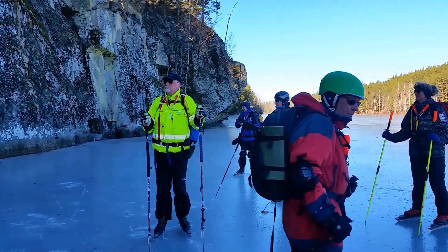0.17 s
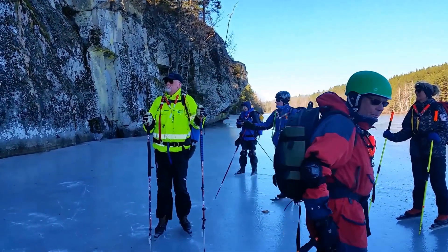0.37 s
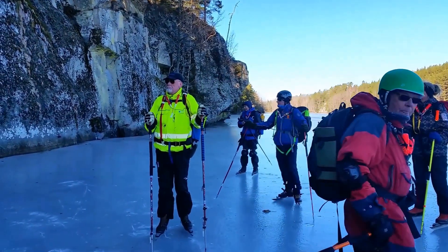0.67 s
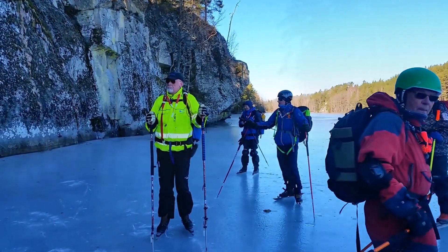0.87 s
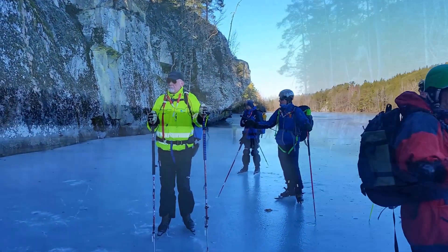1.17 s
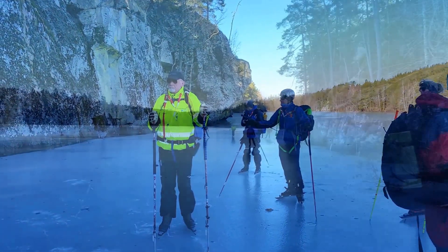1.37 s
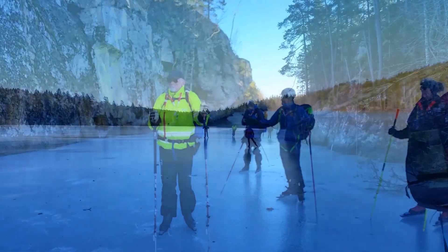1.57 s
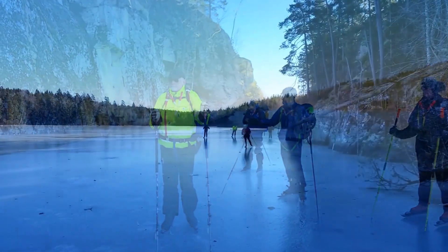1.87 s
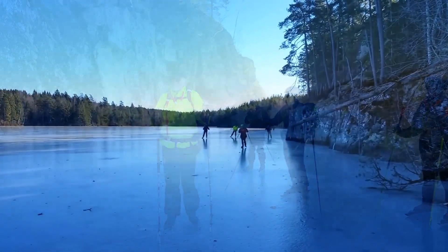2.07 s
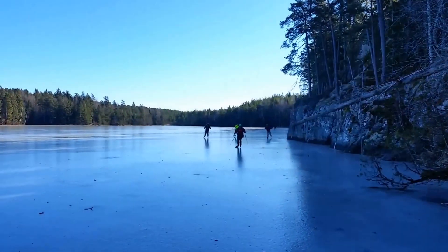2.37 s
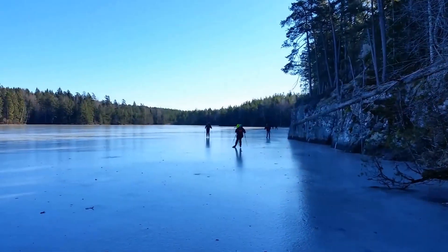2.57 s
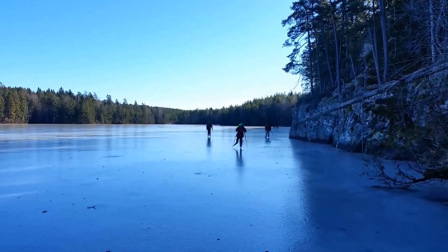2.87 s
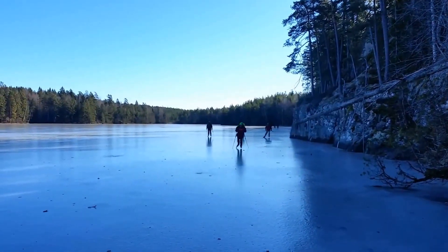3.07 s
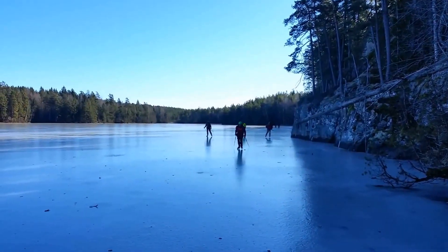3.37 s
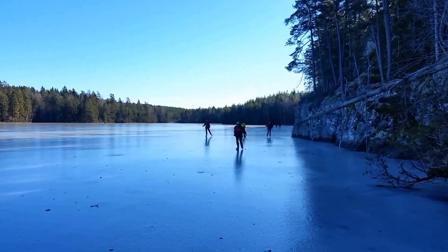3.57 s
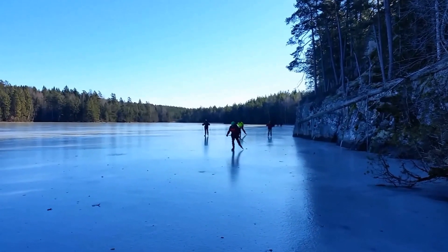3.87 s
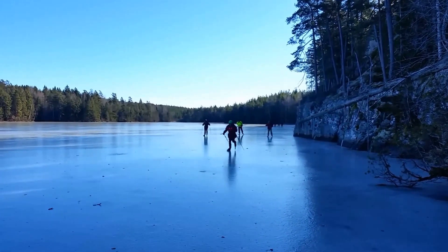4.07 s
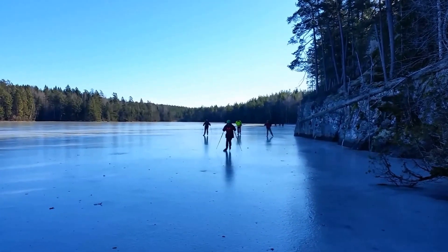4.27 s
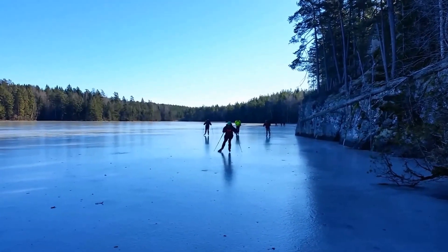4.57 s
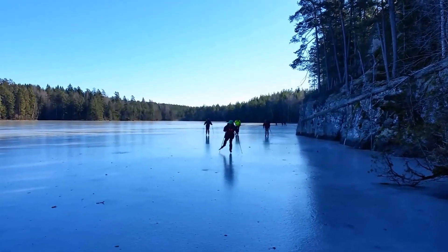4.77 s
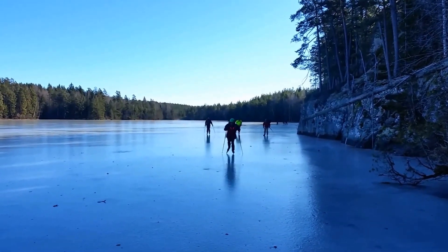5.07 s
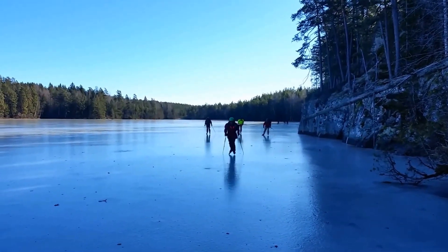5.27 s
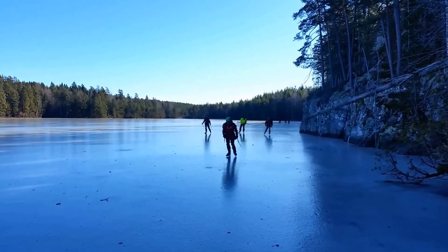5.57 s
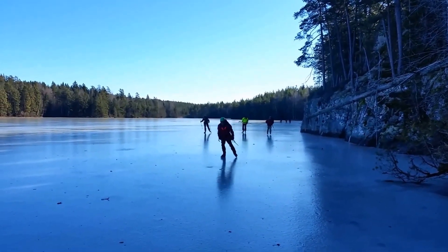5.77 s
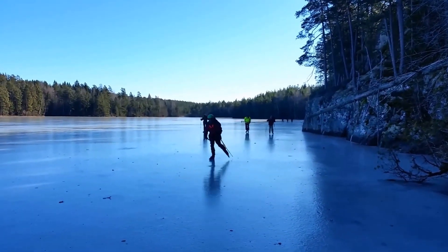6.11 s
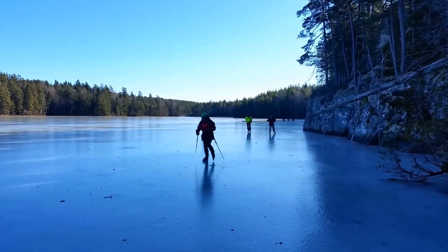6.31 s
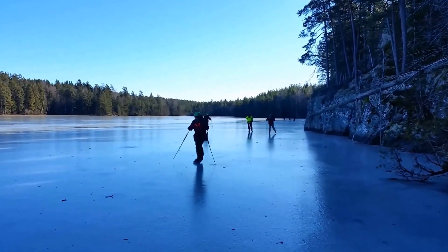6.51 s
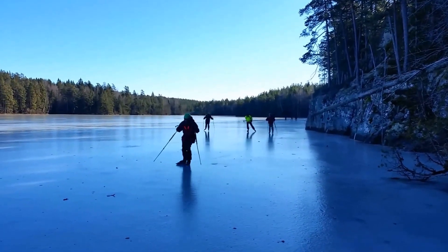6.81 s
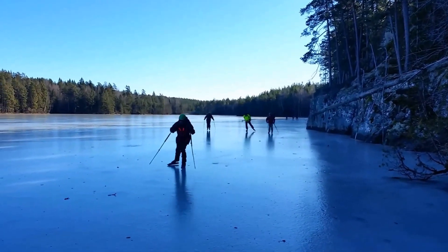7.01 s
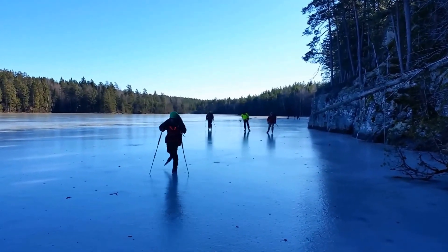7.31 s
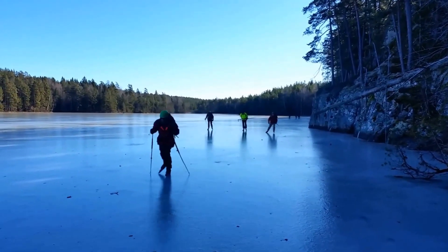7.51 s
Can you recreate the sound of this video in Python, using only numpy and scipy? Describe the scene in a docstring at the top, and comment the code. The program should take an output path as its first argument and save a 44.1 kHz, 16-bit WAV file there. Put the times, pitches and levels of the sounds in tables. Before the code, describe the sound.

Wind rumbles and slaps heavily against a hand-held stereo microphone while steel skates scrape, hiss and tick over hard lake ice.

```python
"""Wind buffets a small hand-held stereo microphone on a frozen lake: a heavy rumble with sharp slaps.
Each port takes its own chance kicks of air. Long steel skates scrape and tick over the hard ice,
close by at first, then farther out: chance ice chips drive dull rings near 2 kHz, a rasp near 5 kHz,
a fine spray and thin, evenly spaced high tones, as from an echo off the ice. Shaped noise adds
a faint hiss, mostly in the left port, and open air."""
import sys
import numpy as np
from scipy.fft import rfft, irfft, next_fast_len
from scipy.io import wavfile
from scipy.ndimage import map_coordinates

SR = 44100
rng = np.random.default_rng(int(sys.argv[2]) if len(sys.argv) > 2 else 0)


def dump(signal):
    """Clip the signal to [-1, 1] and save it as 16-bit WAV at the path in sys.argv[1]."""
    limited = np.clip(np.atleast_2d(signal).T, -1, 1)
    pcm = np.round(limited * 32767).astype(np.int16)
    wavfile.write(sys.argv[1], SR, pcm)


N = 337365
CLOCK_S = np.arange(N) / SR


def amp(db):
    """Decibels to gain."""
    return 10 ** (np.asarray(db) / 20)


def unit(x):
    """Each channel at rms 1."""
    return x / np.sqrt(np.mean(x ** 2, axis=-1, keepdims=True) + 1e-20)


def shape(points):
    """Gain by frequency from (Hz, dB) points on a log axis; all but silent outside them."""
    f, v = np.transpose(points)
    return lambda hz: amp(np.interp(np.log(hz + 1), np.log(f), v, left=-120, right=-120))


def modes(table):
    """The response of a few resonances, alternating in sign, passed twice for steep skirts."""
    def response(f):
        total = 0
        for k, (centre, width, db) in enumerate(table):
            resonance = 1j * f * width / (centre * centre - f * f + 1j * f * width)
            total = total + (-1) ** k * amp(db) * resonance
        return total ** 2
    return response


def curves(rows):
    """One value per sample for each column after the time."""
    s, *columns = np.transpose(rows)
    return np.array([np.interp(CLOCK_S, s, column) for column in columns])


def wobble(rate):
    """A smooth random curve, rate knots a second."""
    knots = rng.standard_normal(int(N * rate / SR) + 4)
    return map_coordinates(knots, [np.arange(N) * rate / SR])


def filtered(x, response):
    """x times a response of frequency."""
    m = next_fast_len(N + 8192)  # padded, so that tails do not wrap round
    return irfft(rfft(x, m) * response(np.fft.rfftfreq(m, 1 / SR)), m)[..., :N]


def grains(rate, spread_db, channels):
    """Random kicks, rate a second: many small, a few large."""
    count = int(rate * N / SR)
    at, sign, size = rng.random((3, channels, count))
    kicks = np.sign(sign - .5) * amp(-spread_db * np.log(size + 0.0032))
    return np.array([np.bincount((a * N).astype(int), k, N) for a, k in zip(at, kicks)])


def lake_air():
    """Soft air over the open lake: shaped noise whose level drifts alike in both ports."""
    # Colour of the air: pitch_hz, level_db (per Hz, relative)
    air_points = [(300, 24), (800, 20), (2000, 16), (3200, -8), (4500, -3), (6000, -34.5), (7500, -55.5),
                  (10500, -25.5), (16000, -23.5)]
    return amp(-57.5 + wobble(4.7)) * unit(filtered(rng.standard_normal((2, N)), shape(air_points)))


def port_hiss():
    """A steady narrow hiss: shaped noise, 13 dB weaker in the right port."""
    # Colour of the hiss: pitch_hz, level_db (per Hz, relative)
    hiss_points = [(300, -27), (1000, -18.5), (2500, -5.5), (3300, -9), (4250, 4.5), (5200, -9),
                   (6500, -50.5), (9000, -40), (11000, -18.5), (16000, -15.5)]
    return amp([[-59], [-72]]) * unit(filtered(rng.standard_normal((2, N)), shape(hiss_points)))


def wind_flow():
    """Eddies hit each port as single pushes; a big push also carries a brighter edge."""
    # Wind on each port, before its chance swells: start_s, strength_db, edge_db (over the rumble)
    left_rows = [(0, -35, 8), (.17, -37, -14), (.3, -20, -16.5), (.62, -35, -21), (.78, -18.5, -20.5),
                 (1.15, -16.5, -20.5), (1.32, -11, -27), (1.5, -15.5, -26), (1.8, -21.5, -13.5),
                 (2.02, -24, -10.5), (2.25, -13, -15), (2.4, -22.5, -28.5), (2.75, -22.5, -25.5),
                 (3.1, -17.5, -14), (3.35, -17, -16.5), (3.5, -47.5, -6.5), (3.75, -43.5, -8),
                 (3.87, -23.5, -14.5), (4.13, -16.5, -17), (4.5, -15.5, -9), (4.75, -17.5, -30),
                 (5.0, -17.5, -8.5), (5.4, -19, -10), (5.7, -16, -7), (6.02, -14.5, -24),
                 (6.45, -16, -22.5), (6.7, -16, -14.5), (7.05, -17, -22), (7.25, -18.5, -13),
                 (7.42, -16.5, -10.5), (7.65, -32.5, -21)]
    right_rows = [(0, -37.5, -4), (.14, -19.5, -23), (.28, -30, -5), (.42, -19.5, -21.5),
                  (.75, -29.5, -16.5), (.9, -22, -12), (1.3, -22, -16), (1.75, -24, -15),
                  (2.1, -26.5, -8.5), (2.42, -18, -17.5), (2.55, -25.5, -15.5), (2.85, -33, -15),
                  (3.42, -21, -12.5), (3.54, -26, -27), (3.61, -22.5, -16.5), (3.67, -16.5, -16),
                  (3.79, -39, -13), (3.95, -21, -13), (4.5, -26, -16), (4.95, -22.5, -15.5),
                  (5.15, -12.5, -8), (5.48, -31, -9.5), (5.87, -15, -12.5), (6.03, -36, -7),
                  (6.22, -36, -17), (6.38, -12, -12), (6.82, -37, -9), (7.0, -28, -11), (7.22, -30, -10.5),
                  (7.52, -21.5, -12), (7.65, -17, -18.5)]
    # Colour of the large eddies: pitch_hz, level_db (per Hz, relative)
    rumble_points = [(15, -35), (25, -18.5), (45, -2), (85, 2.5), (130, -1), (200, -8), (300, -34),
                     (500, -62), (900, -82.5)]
    # Colour of the small eddies: pitch_hz, level_db (per Hz, relative)
    edge_points = [(120, -46.5), (220, 8), (320, -0.5), (500, -12), (800, -19.5), (1200, -37.5),
                   (2000, -45.5), (4000, -77)]
    strength_db, edge_db = np.transpose([curves(left_rows), curves(right_rows)], (1, 0, 2))
    lumps_db = 1.28 * np.array([wobble(10) for port in range(2)])
    flutter_db = 1.76 * np.array([wobble(28) for port in range(2)])
    rumble = unit(filtered(grains(420, 2.9, channels=2), shape(rumble_points)))
    # small eddies ride on the large
    small = grains(600, 1.6, channels=2) * np.abs(np.tanh(0.4 * rumble)) ** 1.39
    edge = amp(edge_db) * unit(filtered(small, shape(edge_points)))
    return amp(strength_db + lumps_db + flutter_db) * (rumble + edge)


def flick(t, delay_s, pitch_hz, phase):
    """A short swing of pressure under a bell; a steeper eddy passes sooner."""
    late = t - delay_s
    return np.cos(2 * np.pi * pitch_hz * late + phase) * np.exp(-(late * pitch_hz / 0.2) ** 2)


def wind_slaps():
    """Strong eddies strike one port and break up; the air in the port swings a cycle or two."""
    # Single strong eddies: start_s, level_db (before the parts add), port (1 left, -1 right), steepness_hz
    slap_rows = [(0.144, -6.5, -1, 250), (0.151, -15.5, -1, 303), (0.175, -15.5, -1, 204),
                 (0.378, -21.5, -1, 199), (0.401, -25, -1, 130), (0.597, -17, -1, 167),
                 (0.765, -11.5, 1, 98), (0.883, -14.5, -1, 139), (0.971, -11.5, 1, 149),
                 (0.994, -20, -1, 250), (1.138, -11.5, 1, 214), (1.239, -13.5, 1, 226),
                 (1.26, -18.5, -1, 219), (1.284, -5.5, 1, 318), (1.3, -10, -1, 225), (1.335, -11, 1, 119),
                 (1.353, -20.5, -1, 150), (1.372, -21, 1, 109), (1.527, -13, 1, 100),
                 (1.571, -15.5, 1, 100), (1.605, -15, -1, 150), (1.651, -9.5, 1, 130), (1.8, -10.5, 1, 162),
                 (2.141, -11.5, 1, 194), (2.161, -12, 1, 165), (2.228, -7.5, 1, 245), (2.27, -10.5, 1, 115),
                 (2.432, -16.5, -1, 143), (2.518, -10.5, 1, 104), (2.649, -10.5, 1, 99),
                 (2.86, -10.5, 1, 113), (2.91, -17.5, 1, 104), (2.968, -13, 1, 128), (3.161, -12.5, 1, 252),
                 (3.192, -14.5, 1, 230), (3.322, -6, 1, 215), (3.353, -9, 1, 326), (3.365, -21, 1, 280),
                 (3.655, -10, -1, 166), (3.952, -17, -1, 215), (4.126, -12.5, 1, 214), (4.144, -20, 1, 257),
                 (4.229, -20, 1, 270), (4.247, -20.5, 1, 290), (4.3, -15, 1, 232), (4.333, -8.5, 1, 238),
                 (4.492, -12, 1, 175), (4.639, -11, 1, 141), (4.679, -15.5, 1, 105), (4.873, -9, 1, 127),
                 (4.968, -20, 1, 219), (4.997, -11.5, 1, 277), (5.03, -21, 1, 160), (5.061, -14, 1, 305),
                 (5.082, -5.5, 1, 160), (5.098, -8.5, 1, 303), (5.108, -11.5, 1, 290),
                 (5.109, -13, -1, 160), (5.122, -13, 1, 400), (5.1252, -4.5, 1, 566), (5.171, -13, 1, 170),
                 (5.09, -12.5, 1, 380), (5.138, -20.5, 1, 300), (5.149, -12.5, -1, 298),
                 (5.195, -7, -1, 228), (5.214, -10.5, -1, 270), (5.226, -29, -1, 250), (5.266, -10, 1, 230),
                 (5.282, -13.5, 1, 228), (5.327, -14, -1, 218), (5.348, -11.5, 1, 220),
                 (5.494, -13.5, 1, 159), (5.506, -20.5, -1, 218), (5.559, -16.5, 1, 222),
                 (5.597, -13, 1, 290), (5.617, -10.5, 1, 254), (5.663, -11.5, 1, 298),
                 (5.775, -16, -1, 203), (5.788, -10, 1, 197), (5.844, -11, 1, 254), (5.896, -13, -1, 120),
                 (5.913, -13, 1, 177), (5.977, -14.5, 1, 99), (6.016, -15, 1, 99), (6.061, -11.5, 1, 133),
                 (6.138, -16, 1, 121), (6.186, -12, 1, 123), (6.275, -10, 1, 104), (6.32, -19, 1, 219),
                 (6.344, -9, 1, 236), (6.376, -12.5, -1, 220), (6.4, -9, 1, 340), (6.413, -20, 1, 300),
                 (6.44, -10.5, 1, 234), (6.485, -9.5, 1, 193), (6.523, -7, 1, 222), (6.54, -13, 1, 246),
                 (6.581, -26, 1, 218), (6.751, -10, 1, 182), (6.845, -11.5, 1, 156), (6.965, -12.5, 1, 222),
                 (7.017, -16.5, 1, 123), (7.06, -21, 1, 103), (7.142, -13.5, 1, 217), (7.306, -13, 1, 227),
                 (7.372, -4.5, 1, 195), (7.398, -11.5, 1, 300), (7.415, -17, 1, 230), (7.432, -8, 1, 230),
                 (7.492, -16, -1, 116), (7.551, -8, -1, 168), (7.576, -11, -1, 150)]
    thud_db, thud_grows = 2, 0.96  # the low swing, and its share of the slap's dB
    t = np.arange(-SR // 50, SR // 25) / SR
    swing = np.exp(-((t - .008) / 0.0085) ** 2)
    slaps = np.zeros((2, N + len(t)))
    for s, db, port, hz in slap_rows:
        phase = rng.uniform(0, 2 * np.pi)
        thud_hz = rng.uniform(78.3, 142.8)
        tumble = 0
        for _ in range(5):  # slower pieces of the eddy
            piece = flick(t, abs(rng.normal(0, .009)), hz * rng.uniform(0.37, 0.84), phase)
            tumble = tumble + rng.normal(0, 0.79) * piece
        thud = amp(thud_db + thud_grows * db) * swing * np.sin(2 * np.pi * thud_hz * t + phase)
        slap = amp(db) * (1.35 * flick(t, 0, hz, phase) + tumble) + thud
        slaps[int(port < 0), round((s + t[0]) * SR):][:len(t)] += slap
    return slaps[:, :N]


def push(start, length, attack_s, release_s):
    """Gain of one push: it rises, arches over its length and fades by 60 dB in release_s."""
    t = CLOCK_S - start
    arch_db = -3 * np.clip(2 * t / length - 1, -1, 1) ** 2  # softer at both ends
    fade_db = -60 * np.clip(t - length, 0, 1) / release_s
    return np.clip(t / attack_s, 0, 1) * amp(arch_db + fade_db)


def played(rows, attack_s=0.015, release_s=0.2, rise_share=0.28):
    """Summed power of pushes; a short one rises within rise_share of its length."""
    power = 0
    for s, length, *levels in rows:
        gain = push(s, length, min(attack_s, rise_share * length), release_s)
        power = power + (amp(levels)[:, None] * gain) ** 2
    return power


def effort():
    """Power of each skate layer: the steady glide with the pushes on top."""
    # All levels here stand before the chatter of the edge.
    # Blades running straight: start_s, spray_db
    glide_rows = [(0, -51.5), (.55, -53.5), (1.5, -59), (2.3, -57), (2.4, -65.5), (3.2, -76), (3.6, -72),
                  (4.1, -62), (5.0, -64), (5.15, -83), (5.27, -80.5), (5.7, -63), (7.4, -61.5), (7.65, -63)]
    # A blade pushes on its edge, as at the right port:
    # start_s, length_s, low_ring_db, high_ring_db, rasp_db, spray_db
    stroke_rows = [(0.087, 0.18, -42.5, -53.5, -57, -45.5), (0.165, 0.044, -47.5, -60, -62, -63),
                   (0.394, 0.085, -53, -60, -60, -48), (0.45, 0.018, -61.5, -50, -67.5, -59),
                   (0.685, .03, -48, -60, -59.5, -48.5), (1.29, 0.058, -53, -59, -68, -65),
                   (1.36, 0.16, -55.5, -53, -61, -64.5), (1.46, 0.036, -54, -57.5, -68, -63.5),
                   (1.704, 0.17, -59.5, -60, -52, -52), (1.94, 0.15, -50, -54, -49, -46.5),
                   (2.05, 0.093, -47, -56.5, -42.5, -39.5), (2.81, 0.03, -47, -53, -56, -69),
                   (3.686, 0.016, -46, -44, -49.5, -55), (3.715, 0.035, -68, -60, -62, -68.5),
                   (3.76, 0.057, -63, -53, -48, -61), (3.85, .05, -57.5, -63, -49.5, -60.5),
                   (3.925, 0.081, -61, -62, -47.5, -52), (4.27, 0.018, -71, -74, -55.5, -59.5),
                   (4.379, 0.077, -59, -50, -53, -54), (4.496, 0.088, -56, -50, -55.5, -55.5),
                   (4.833, 0.048, -49.5, -49.5, -51, -65.5), (4.929, 0.2, -53.5, -58.5, -75, -73.5),
                   (5.3, 0.37, -59, -54.5, -55, -62), (5.568, 0.042, -45.5, -63, -59.5, -66),
                   (5.73, 0.12, -46, -42.5, -49, -56), (5.863, 0.53, -58, -62.5, -49, -60),
                   (6.35, 0.49, -58, -58, -55.5, -63.5), (6.525, 0.046, -54, -58, -53, -52.5),
                   (6.635, 0.67, -53.5, -57.5, -52.5, -56), (6.89, 0.049, -41, -49, -51, -46.5),
                   (7.22, 0.18, -66, -51, -58.5, -65.5)]
    # Thin, evenly spaced high tones colour the scrape: start_s, length_s, level_db
    comb_rows = [(4.39, 0.044, -58), (5.31, 0.077, -57.5), (5.4, 0.096, -52.5), (5.5, 0.099, -63),
                 (5.75, 0.086, -57), (5.9, 0.45, -65.5), (6.45, 0.62, -67), (6.86, 0.17, -61),
                 (7.0, 0.35, -72.5)]
    # A blade turning close by grinds: start_s, length_s, level_db
    turn_rows = [(0, 0.076, -48.5), (0.1, 0.23, -54), (0.4, 0.074, -52), (2.05, 0.083, -38.5)]
    # A soft, broad hiss near 8 kHz accompanies some of the rasping strokes: start_s, length_s, level_db
    sheen_rows = [(5.43, 0.059, -59), (5.5, .1, -77), (5.74, 0.33, -67), (6.05, .45, -59),
                  (6.55, 0.27, -62), (6.85, .45, -66)]
    # A blade digs in and stops dead; columns as for the strokes
    skid_row = (2.305, .042, -43.5, -54, -54, -47)
    # Ice dust thrown past the microphone, all sizzle: start_s, length_s, level_db
    shower_row = (0.11, 0.16, -31.5)
    close_until_s, close_db, far_db = 2.37, -1.5, -4.5  # sizzle over spray: blades beside us, then out on the lake

    spray_db, = curves(glide_rows)
    swing_db = spray_db + 65  # about a middling spray
    # each: level at middling spray, and its share of the spray's swings
    low_ring = amp(-64.5 + 0.16 * swing_db) ** 2
    high_ring = amp(-69 + 0.18 * swing_db) ** 2
    rasp = amp(-63 + 0.41 * swing_db) ** 2
    grind = amp(-69 + 0.83 * swing_db) ** 2

    skid = played([skid_row], 1, .02, 0.85)
    blades = played(stroke_rows) + skid + [low_ring, high_ring, rasp, amp(spray_db) ** 2]
    sizzle = amp(np.where(CLOCK_S < close_until_s, close_db, far_db)) ** 2 * blades[-1]
    sizzle = sizzle + played([shower_row])
    comb_tones = played(comb_rows, 0.024, 0.24, .5)  # swell and fade softly
    grind = grind + played(turn_rows) + amp(2.5) ** 2 * skid[0]
    return np.vstack([blades, sizzle, comb_tones, grind, played(sheen_rows)])


def add_ticks(power):
    """Blade catches and pole tips add short bursts of power to the skate layers."""
    # Ticks, before the layer trims below: start_s, spray_db, ring_db, rasp_db
    tick_rows = [(0.1454, -28.5, -56, -50), (0.188, -20.5, -53, -57), (0.206, -19, -45, -45),
                 (0.2217, -25, -61, -47), (0.2378, -26.5, -54, -51.5), (0.2457, -34.5, -52, -73),
                 (0.257, -33.5, -46, -57), (0.2696, -27.5, -53, -44), (0.326, -35, -63, -51.5),
                 (0.685, -33, -43, -45), (1.201, -39.5, -64, -52), (1.713, -56.5, -47.5, -42),
                 (1.7577, -43.5, -52, -34.5), (1.947, -22.5, -30, -32), (2.0023, -18, -30.5, -31),
                 (2.34, -30.5, -37.5, -44), (2.508, -59, -49, -47), (2.585, -63, -49, -57),
                 (2.676, -69, -48, -57.5), (2.788, -60.5, -44.5, -52.5), (2.8467, -56.5, -40, -64.5),
                 (2.895, -63.5, -48.5, -61), (3.628, -53.5, -43.5, -56.5), (3.674, -43, -39.5, -47.5),
                 (3.686, -51.5, -40, -47.5), (3.742, -63.5, -55, -46.5), (3.769, -51.5, -40.5, -43),
                 (3.784, -58, -46.5, -45), (3.806, -61.5, -54, -47.5), (3.855, -59.5, -44.5, -41.5),
                 (3.9575, -52, -41, -43.5), (4.289, -35.5, -65, -53.5), (4.373, -30.5, -44, -42),
                 (4.521, -48, -37, -62), (4.5638, -38, -43, -56), (4.6244, -28, -36, -44),
                 (4.7492, -47.5, -38, -49.5), (4.83, -38, -42, -58.5), (4.8613, -65, -36, -48.5),
                 (5.295, -47.5, -48, -53), (5.573, -51.5, -58, -42), (5.59, -58, -59, -47.5),
                 (5.957, -43.5, -37, -43), (6.4649, -53.5, -30.5, -42.5), (6.54, -34, -62, -47),
                 (6.696, -29.5, -38, -39), (6.773, -49, -39.5, -58), (6.984, -40, -43, -32.5),
                 (7.111, -57, -38, -51), (7.1567, -42.5, -62, -59), (7.225, -36, -44, -40.5),
                 (7.238, -53.5, -36.5, -58.5), (7.263, -53, -42, -55.5), (7.285, -59, -48, -46),
                 (7.361, -35.5, -34.5, -41.5), (7.4001, -36, -39, -49.5), (7.462, -66, -56, -56.5),
                 (7.502, -42.5, -61, -71), (7.5317, -44, -55, -70)]
    t = np.arange(SR // 8) / SR
    burst = amp(-60 * t / 0.026) * (1 - np.exp(-t / 0.0016))
    for s, spray_db, ring_db, rasp_db in tick_rows:
        part = power[:, round(s * SR):][:, :len(t)]  # a view: power itself grows
        levels_db = [[ring_db + 4.0], [ring_db + 2.5], [rasp_db + 7.0], [spray_db - 2.5],
                     [spray_db - 4], [-120], [ring_db - 2.0], [-120]]
        part += (amp(levels_db) * burst[:part.shape[1]]) ** 2


def drifting(x, colour):
    """x through a resonance that wanders up and down as the load on the blade changes."""
    shift = .025  # share of the pitch, either way
    turn = np.pi / 4 * (1 + np.tanh(1.5 * wobble(9)))
    higher = filtered(x * np.sin(turn), lambda f: colour(f * (1 - shift)))
    lower = filtered(x * np.cos(turn), lambda f: colour(f * (1 + shift)))
    return higher + lower


def skates():
    """Ice chips break under the blade: grains excite the rings, the rasp, the spray and the high tones."""
    # Layer order: low ring, high ring, rasp, spray, sizzle, comb tones, grind, sheen.
    # Each layer at the ports: left_over_right_db, likeness (0-1), left_lag (samples, rounded)
    port_rows = [(-1.5, 0.7, 7.7), (-3, 1, 3.6), (-9.5, 0, 7.6), (-2.5, 0, 9), (-0.5, 0.4, 12.5), (7, 1, 1),
                 (-3.5, 0, 5), (-16, 0.2, 3)]
    # Blade and ice in three lists (low, high, grind), before the second pass: pitch_hz, width_hz, level_db
    ring_modes = [
        [(860, 450, -1.5), (1210, 160, 3.5), (1480, 204, 2.5)],
        [(2067, 440, 0)],
        [(1690, 540, 4.5), (3073, 550, 3.5)],
    ]
    # High tones, as from an echo off the ice, before the second pass: pitch_hz, width_hz, level_db
    comb_modes = [(9830, 220, -4), (10560, 200, 1), (11400, 320, -0.5), (12200, 220, -4), (12750, 240, -2),
                  (13500, 200, -9.5)]
    # Soft, broad hiss near 8 kHz, before the second pass: pitch_hz, width_hz, level_db
    sheen_modes = [(7310, 400, -3.5), (8200, 910, 1.5)]
    # Colours of the noisy layers: pitch_hz, level_db (per Hz, relative)
    rasp_points = [(2400, 2), (3100, -8), (3500, -2), (4200, 5), (5200, 3.5), (6100, -7.5), (6900, -23),
                   (8000, -28.5)]
    spray_points = [(6000, -13), (7000, -18.5), (8000, -13.5), (9100, -11.5), (10500, 2), (11700, 3),
                    (13000, -2), (14200, -23)]
    sizzle_points = [(12500, -26.5), (13600, -0.5), (14500, -6.5), (15500, -5), (16500, 3.5)]
    grit, dust = (2200, 3), (3500, 2)  # coarse and fine: chips a second, size spread in dB

    chatter_db = 2.15 * wobble(75) + 1.8 * wobble(18)  # the edge grips and slips
    own_db = 1.48 * np.array([wobble(45) for _ in port_rows])
    power = effort() * amp(chatter_db + own_db) ** 2
    add_ticks(power)
    colours = [modes(ring_modes[0]), modes(ring_modes[1]), shape(rasp_points), shape(spray_points),
               shape(sizzle_points), modes(comb_modes), modes(ring_modes[2]), modes(sheen_modes)]
    out = np.zeros((2, N))
    for k, (level, colour, (pan_db, alike, lag)) in enumerate(zip(power, colours, port_rows)):
        chip_kind = grit if k in (0, 1, 6) else dust  # coarse chips drive the rings and the grind
        a, b = unit(grains(*chip_kind, channels=2))
        # mix two independent streams until the ports are as alike as asked
        turn = np.arccos(np.clip(alike, 0, 1)) / 2
        left = np.cos(turn) * a + np.sin(turn) * b
        right = np.cos(turn) * a - np.sin(turn) * b
        chips = np.array([np.roll(left, round(lag)), right])
        # even out the loudness of the colours
        scale = np.sqrt(np.mean(np.abs(colour(np.linspace(1, SR / 2, num=4000))) ** 2))
        passed = drifting if k < 2 else filtered  # only the low and high rings drift
        out += amp([[pan_db], [0]]) * passed(chips * np.sqrt(level), colour) / scale
    return out


def scene():
    """The quiet of the lake, the wind on the ports and the skates."""
    return lake_air() + port_hiss() + wind_flow() + wind_slaps() + skates()


def record(dry):
    """The microphone rounds off the loudest peaks near full scale and passes nothing above its band limit."""
    top_hz = 15780
    soft = dry / (1 + np.abs(dry) ** 6) ** (1 / 6)
    return filtered(soft, lambda hz: hz < top_hz)


dry = scene()
out = record(dry)
dump(out)
```